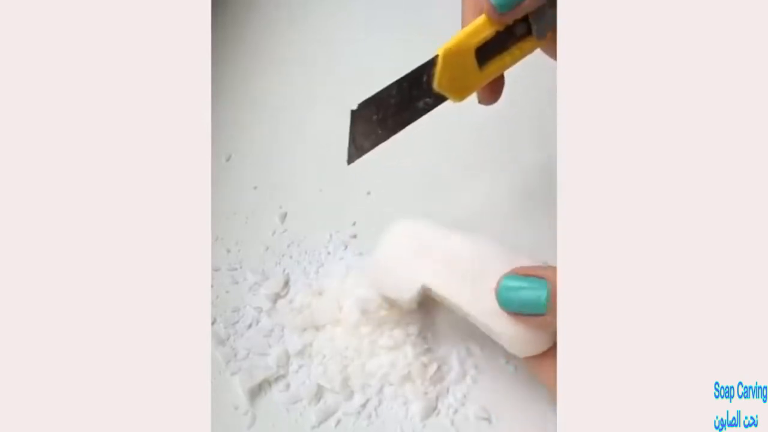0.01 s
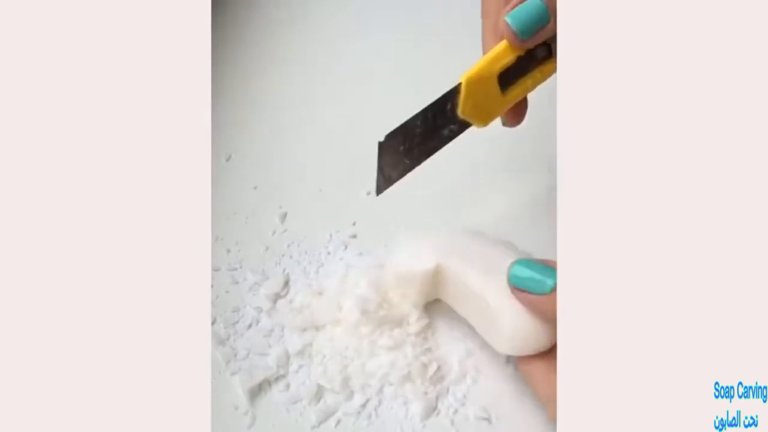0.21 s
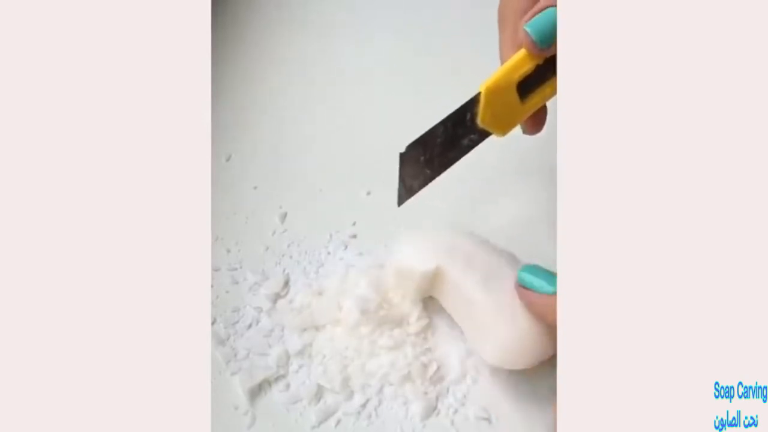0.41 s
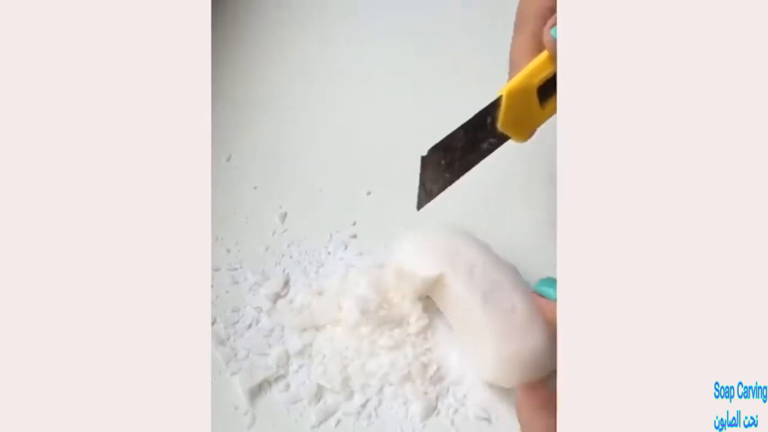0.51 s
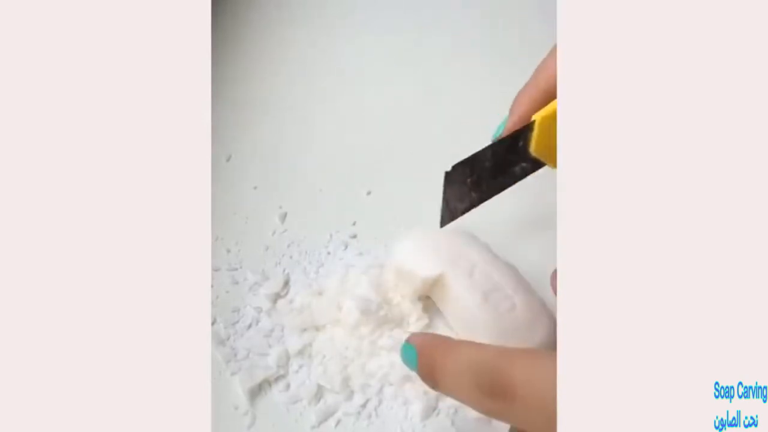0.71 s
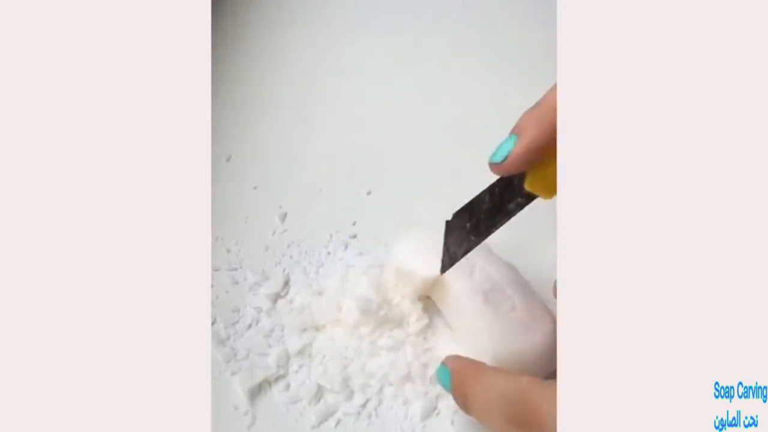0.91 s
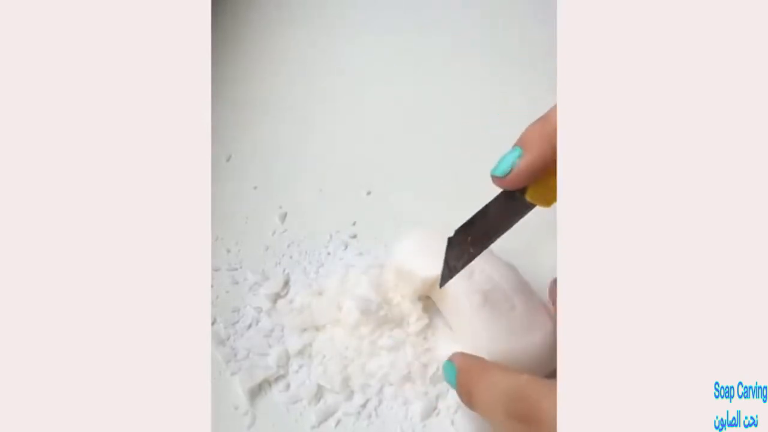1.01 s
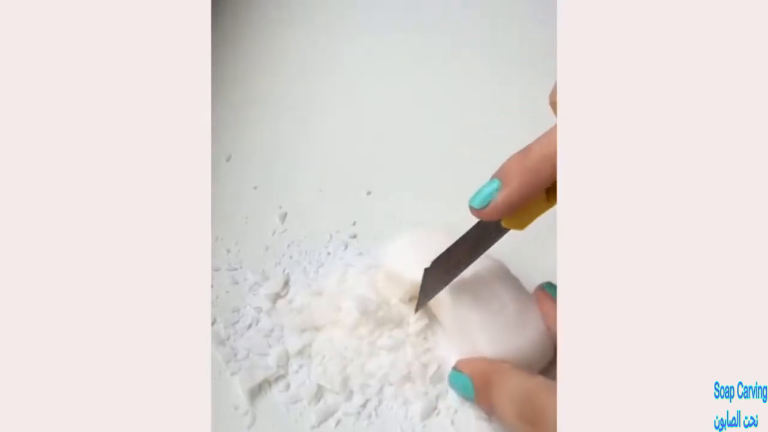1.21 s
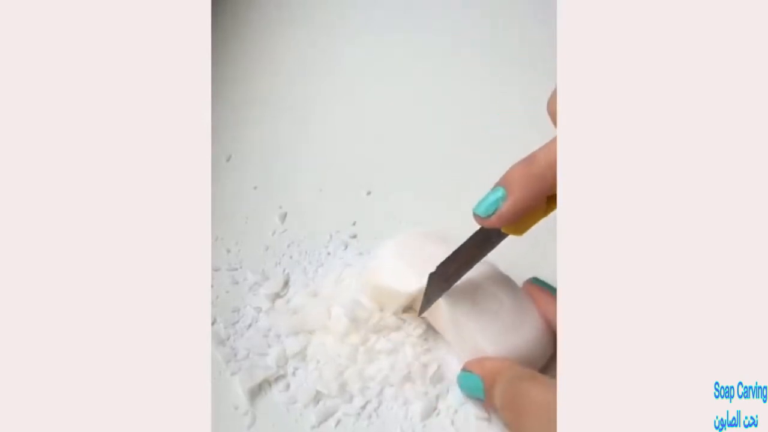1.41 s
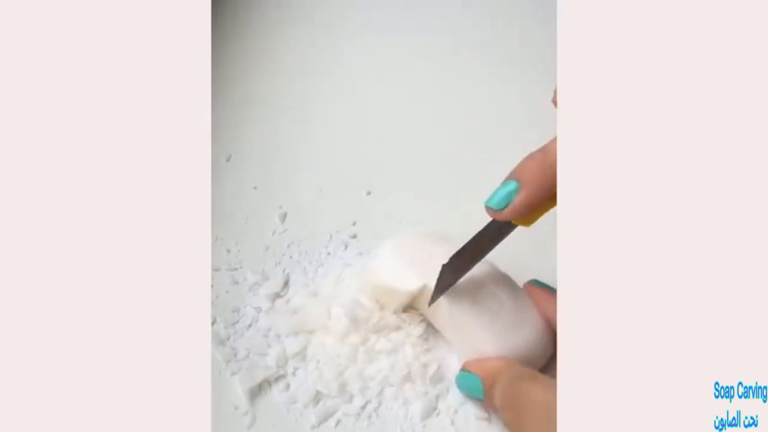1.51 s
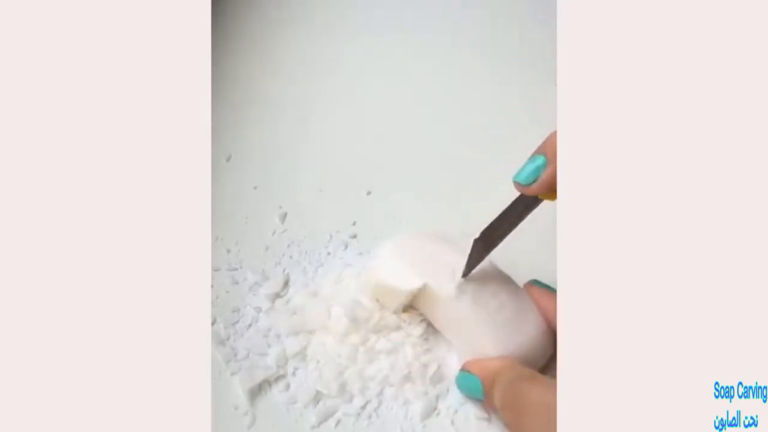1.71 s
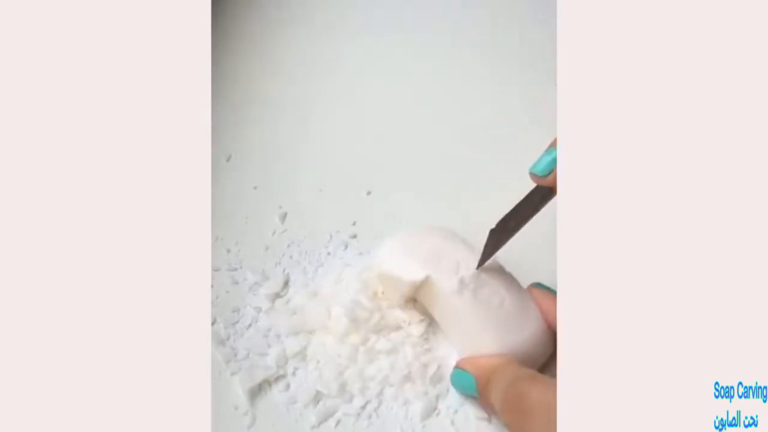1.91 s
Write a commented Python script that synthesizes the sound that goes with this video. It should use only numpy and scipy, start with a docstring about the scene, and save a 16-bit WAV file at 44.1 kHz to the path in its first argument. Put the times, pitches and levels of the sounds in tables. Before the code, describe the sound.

A blade scraping dry soap, heard close in a small quiet room. Faint finger brushing, then one dominant hollow knock of the bar on the table at 0.2 s, briefly booming. Near silence until small clicks from 0.79 s and a sharp bright click at 0.9. A soft, crumbly, hoarse rasp runs 0.92-1.58 s, swelling near 1.5; a short stroke from 1.7 snaps at 1.84 and fades.

```python
"""In a small quiet room, close by, a bar of dry soap is turned in the hand and knocked down on a table.
Each knock rings the table top's modes, booms briefly and crushes some grit. A craft knife clicks as it is
gripped and set on the bar, then its thin blade rasps through the soap in a long and a short stroke: friction
noise and breaking crumbs, coloured by the blade. The table rumbles faintly, and the cut ends with a snap."""
import sys
import numpy as np
from scipy import signal
from scipy.fft import rfft, irfft, next_fast_len
from scipy.io import wavfile
from scipy.ndimage import uniform_filter1d, map_coordinates

SR = 44100
rng = np.random.default_rng(int(sys.argv[2]) if len(sys.argv) > 2 else 0)


def store_wav(level_fs):
    """Save 16-bit WAV to argv[1]."""
    pcm = np.round(np.clip(np.atleast_2d(level_fs), -1, 1) * 32767)
    wavfile.write(sys.argv[1], SR, pcm.T.astype(np.int16))


N = 88200
T = np.arange(N) / SR  # time of each sample in seconds
FLUTTER_DB = 0.7  # random level changes of the rasp and of the brushing fingers


def amp(db):
    """Turns decibels into gain."""
    return 10 ** (np.asarray(db) / 20)


def unit(x):
    """Scales a sound to an rms of 1."""
    return x / np.sqrt(np.mean(x ** 2) + 1e-20)


def along(points, hz):
    """Reads (pitch_hz, value) points at any frequency, on a log axis."""
    point_hz, value = np.transpose(points)
    return np.interp(np.log(hz + 1), np.log(point_hz + 1), value)


def level(rows):
    """Draws a gain for every sample through (time_s, level_db) points."""
    return amp(np.interp(T, *np.transpose(rows)))


def wobble(rate):
    """A smooth random curve through `rate` random values a second."""
    return map_coordinates(rng.standard_normal(N // 8), [T * rate], mode="wrap")


def filtered(x, response):
    """Multiplies the spectrum of x by a response that depends on frequency."""
    size = next_fast_len(N + SR // 2)
    hz = np.fft.rfftfreq(size, 1 / SR)
    return irfft(rfft(x, size) * response(hz), size)[:N]


def coloured(x, spectrum, peaks=()):
    """Shapes x by (pitch_hz, level_db) points and (pitch_hz, width_hz, level_db) resonances, at rms 1."""
    def response(hz):
        peak_db = sum(db / (1 + ((hz - centre) / width) ** 2) for centre, width, db in peaks)
        return amp(along(spectrum, hz) + peak_db)
    return unit(filtered(x, response))


def noise(spectrum, peaks=()):
    """Coloured noise at rms 1."""
    return coloured(rng.standard_normal(N), spectrum, peaks)


def crumbs():
    """Crumbling soap: tiny fractures of random size at random moments, at rms 1."""
    per_s, spread_db = 2000, 7.5
    max_db = 10  # the largest crumb over a typical one
    hits = (rng.random(N) < per_s / SR) * rng.choice([-1, 1], N)
    size_db = np.minimum(spread_db * rng.standard_normal(N), max_db)
    return unit(hits * amp(size_db))


def patchy(x):
    """The colour shifts as the edge meets new soap: patches some hundred Hz wide and tens of ms long."""
    patch_db = 1.4
    grid = signal.stft(x, nperseg=256)[2]
    field = uniform_filter1d(rng.standard_normal(grid.shape), size=4, axis=0)
    field = uniform_filter1d(field, size=12, axis=1)
    return signal.istft(grid * amp(patch_db * unit(field)), nperseg=256)[1][:N]


def room(x, wet_db):
    """Adds the room's short tail of echoes, a fading noise whose treble dies first."""
    # how long the tail takes to fall by 60 dB: pitch_hz, fade_s
    room_fade = [(100, 0.53), (500, 0.36), (1500, 0.23), (5000, .17), (13000, 0.06)]
    # colour of the echoes: pitch_hz, level_db
    room_colour = [(60, -7.5), (110, -5), (200, 5.5), (400, 2), (600, -7.5), (900, -2), (2500, -1),
                   (13000, 2)]
    delay_s = .005
    hz, t, grid = signal.stft(rng.standard_normal(SR // 2), SR, nperseg=256)
    fade = amp(-60 * t / along(room_fade, hz)[:, None])
    tail = signal.istft(grid * fade, SR, nperseg=256)[1]
    tail = np.pad(tail / np.linalg.norm(tail), (int(delay_s * SR), 0))
    echoes = signal.fftconvolve(x, tail)[:N]
    return x + amp(wet_db) * filtered(echoes, lambda f: amp(along(room_colour, f)))


def knocks():
    """Each knock pushes the table, rings its modes, leaves a short boom and crushes some grit."""
    # the bar meets the table: start_s, level_db, crunch_db (gritty crunch relative to the level)
    knock_list = [(.0703, -55, -9.5), (0.2012, -4.5, -22), (0.8178, -45, -30), (0.934, -49.5, -3),
                  (0.9446, -45.5, -21.5), (1.483, -50, -7.5), (1.5445, -49, -9.5), (1.822, -50.5, -9)]
    # ringing modes of the table top: pitch_hz, level_db, fade_s (time to fall by 60 dB)
    table_modes = [(46.37, -28.5, .16), (120.4, -35, 0.33), (171.5, -19, .22), (262, -19.5, .06),
                   (289, -25, 0.16), (379.3, -14.5, 0.083), (535, -5, 0.058), (647, -0.5, 0.035),
                   (796, -21, 0.064), (1008, -11.5, .028), (1660, -28, .03), (2054, -28.5, 0.055),
                   (2242, -23, .045), (2580, -33.5, .04)]
    # the table's dense weaker modes, ringing on into the room: pitch_hz, level_db
    boom_colour = [(30, -14), (95, -20), (130, -7), (195, 3), (300, -1), (420, 2.5), (560, -1), (750, -4.5),
                   (1100, -12.5), (1300, -25), (2300, -26), (3500, -36), (7000, -49.5)]
    # crumbs crushed under the bar: pitch_hz, level_db
    crunch_colour = [(200, -18), (900, -0.5), (2200, 4.5), (4200, -3), (5500, 2.5), (8000, -3), (11500, 1),
                     (14000, 2)]
    push_db, push_s = -2, .0004
    boom_db, boom_fade_s, boom_rise_s = -23, .29, .005
    crunch_hold_s, crunch_fade_s = 0.007, .032
    wood, boom, grit = np.zeros((3, N))
    for start, db, crunch_db in knock_list:
        t = np.maximum(T - start, 0)
        ring = sum(amp(mode_db - 60 * t / fade_s) * np.sin(2 * np.pi * hz * t)
                   for hz, mode_db, fade_s in table_modes)
        u = t / push_s
        push = amp(push_db) * u * np.exp(1 - u)  # one short bump
        wood += amp(db) * (ring - push)
        boom_shape = amp(db + boom_db - 60 * t / boom_fade_s) * (1 - np.exp(-t / boom_rise_s))
        boom += boom_shape * noise(boom_colour)
        fade = amp(-60 * np.maximum(t - crunch_hold_s, 0) / crunch_fade_s)
        crunch = coloured(crumbs() + rng.standard_normal(N), crunch_colour)
        grit += amp(db + crunch_db) * (T > start) * fade * crunch
    return room(wood, wet_db=-20) + boom + room(grit, wet_db=-22.5)


def rasp():
    """Powdery friction and breaking crumbs, coloured by the blade, which sings hoarsely in the deep cut."""
    # how loud the rasp is: time_s, level_db
    rasp_level = [(0, -100), (.785, -94), (.81, -72), (.885, -76), (.92, -65), (.98, -57.5), (1.05, -62),
                  (1.085, -68), (1.15, -55), (1.195, -60.5), (1.28, -58.5), (1.44, -57), (1.49, -51),
                  (1.528, -60), (1.548, -57), (1.586, -69), (1.665, -74.5), (1.77, -57), (1.835, -59.5),
                  (1.88, -66.5), (2, -83)]
    # colour of the cut soap: pitch_hz, level_db
    soap_colour = [(300, -23), (700, -1.5), (1000, -6), (1450, 1), (2100, -7), (3300, -5), (5000, -3.5),
                   (6400, -6), (8400, -1.5), (9500, -3), (12000, 0), (14000, -2.5)]
    # resonances of the blade: pitch_hz, width_hz, level_db
    blade_peaks = [(2960, 340, 6), (3856, 100, 5), (4185, 140, 5.5), (6920, 120, 6), (8225, 300, 1),
                   (11850, 350, 1)]
    # the main resonance relative to the rasp, growing as the blade sinks in: time_s, level_db
    sing_level = [(.9, -16.5), (1.12, -13), (1.25, -9.5), (1.38, -6), (1.48, -7.5), (1.58, -7.5),
                  (1.64, -14), (1.76, -8.5), (1.85, -11)]
    sing_hz, sing_width_hz, sing_flutter_db = 5680, 330, 1
    crumb_db = -4.5  # crumbs against friction noise
    friction = patchy(rng.standard_normal(N) + amp(crumb_db) * crumbs())
    sing = unit(filtered(rng.standard_normal(N), lambda f: 1 / (1 + ((f - sing_hz) / sing_width_hz) ** 4)))
    sing = sing * level(sing_level) * amp(sing_flutter_db * wobble(80))
    stroke = level(rasp_level) * amp(FLUTTER_DB * wobble(110))
    return stroke * (coloured(friction, soap_colour, blade_peaks) + sing)


def clicks():
    """The blade slips and snaps: a fast-swelling bright burst with a damped low ring and a hissy high one."""
    # knife clicks: start_s, level_db, rise_s, fade_s (time to fall by 60 dB), low_ring_hz, low_ring_db,
    # high_ring_hz, high_ring_width_hz, high_ring_db
    click_list = [(0.7903, -40.5, 0.00052, 0.023, 2180, -6.5, 5700, 300, 3.5),
                  (0.8063, -61, 0.0043, .04, 3370, -12, 5660, 250, 24),
                  (.819, -63, .002, 0.022, 5800, -6, 12000, 600, 6),
                  (0.8428, -61, .001, .03, 3800, -2, 5580, 400, 20),
                  (0.899, -24, .0013, 0.016, 2750, -13, 7230, 594, 4),
                  (0.967, -48.5, .002, 0.021, 6040, -3, 11500, 600, -4),
                  (1.546, -53, .001, 0.021, 2960, 4, 5660, 400, 5),
                  (1.8409, -32, 0.00092, .022, 2970, -0.5, 12600, 895, 11)]
    # colour of the burst: pitch_hz, level_db
    click_colour = [(200, -29.5), (1000, -35), (1500, -7.5), (2000, -17), (2500, 0), (3100, -0.5),
                    (3600, -7.5), (4200, -1.5), (6000, -1.5), (8200, -5.5), (9700, 0.5), (11500, -5),
                    (13500, -1.5)]
    low_fade_s = 0.011  # the soap damps the blade quickly
    snaps, rings = np.zeros((2, N))
    for start, db, rise_s, fade_s, low_hz, low_db, high_hz, width_hz, high_db in click_list:
        t = np.maximum(T - start, 0)
        swell = amp(db) * np.exp(np.minimum(T - start, 0) / rise_s)  # grows up to the start time
        snaps += swell * amp(-60 * t / fade_s) * noise(click_colour, [(high_hz, width_hz, high_db)])
        low_ring = np.sin(2 * np.pi * low_hz * (T - start))
        rings += swell * amp(low_db - 60 * t / low_fade_s) * low_ring
    return room(snaps, wet_db=-13.5) + room(rings, wet_db=-15.5)


def handling():
    """Fingers brush the bar, the bar rubs on the table, and the hand leans once with a soft thud."""
    # fingers brushing the bar: time_s, level_db
    finger_level = [(0, -52), (.015, -66), (.075, -68), (.11, -74), (.15, -61.5), (.185, -67.5), (.27, -68),
                    (.36, -70), (.39, -74.5), (.42, -67.5), (.48, -82), (.6, -83), (.78, -94), (2, -100)]
    # colour of the brushing skin: pitch_hz, level_db
    skin_colour = [(200, -10.5), (900, 4), (2200, 3), (3500, 3), (7000, -4.5), (13000, 0.5)]
    # the table's rumble under the moving bar: time_s, level_db
    rumble_level = [(0, -54), (.06, -60), (.11, -63.5), (.15, -63), (.185, -59.5), (.25, -64.5), (.5, -75),
                    (.79, -80), (.83, -54.5), (.885, -64), (.945, -59), (1.04, -61), (1.08, -67.5),
                    (1.15, -61), (1.4, -65), (1.49, -52), (1.585, -71.5), (1.67, -68), (1.76, -64),
                    (1.782, -55.5), (1.81, -66.5), (1.87, -73.5), (2, -79.5)]
    # colour of that rumble: pitch_hz, level_db
    rub_colour = [(30, -11), (90, -6.5), (120, 0), (145, -6.5), (170, 8), (210, -8.5), (262, 2),
                  (330, -6.5), (450, -9.5), (680, -8.5), (900, -19.5), (1500, -25), (4000, -42)]
    rub_flutter_db = 1.36
    press_s, press_db, press_hz, press_width_s = 1.226, -53.5, 56.2, 0.011  # the hand leans on the table
    brush = level(finger_level) * amp(FLUTTER_DB * wobble(100))
    brush = brush * coloured(rng.standard_normal(N) + crumbs(), skin_colour)
    rub = level(rumble_level) * amp(rub_flutter_db * wobble(45)) * noise(rub_colour)
    t = T - press_s
    thud = amp(press_db) * np.exp(-(t / press_width_s) ** 2) * np.sin(2 * np.pi * press_hz * t)
    return brush + rub + thud


def room_tone():
    """The quiet room: a steady, mostly low noise."""
    # colour of the room tone: pitch_hz, level_db
    floor_colour = [(15, -38), (25, -2), (80, -2), (213, -22), (278, -20.5), (569, -33.5), (824, -21.5),
                    (1510, -31.5), (1820, -28), (2780, -31), (14000, -31.5)]
    floor_db = -67.5
    return amp(floor_db) * noise(floor_colour)


def scene():
    """Everything on the table, over the room tone."""
    return (knocks() + rasp() + clicks() + handling() + room_tone())[None]


def record(dry):
    """Cuts the sound off very steeply above its top frequency."""
    top_hz = 13950
    return filtered(dry[0], lambda hz: 1 / np.sqrt(1 + (hz / top_hz) ** 360))[None]


dry = scene()
out = record(dry)
store_wav(out)
```